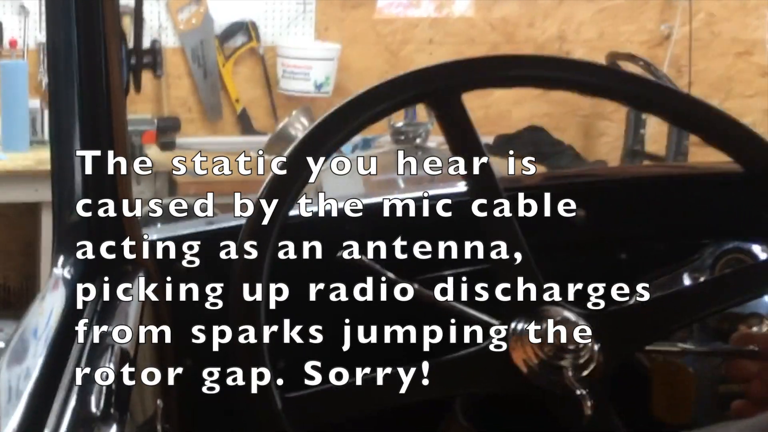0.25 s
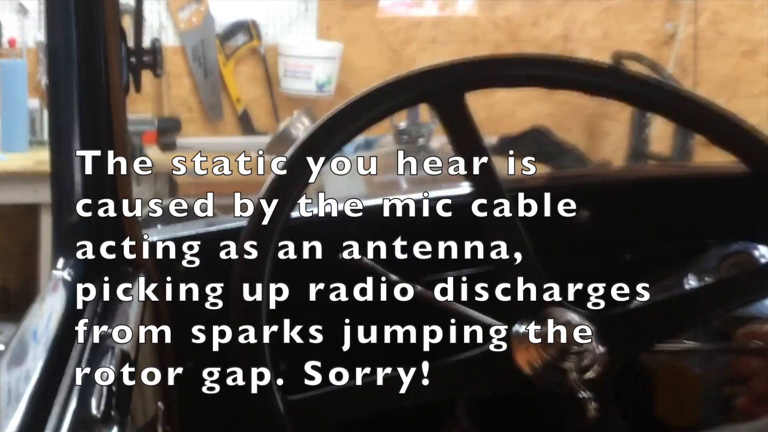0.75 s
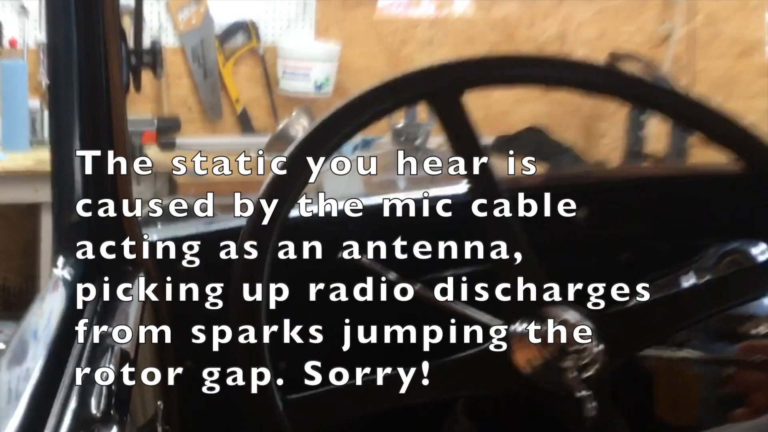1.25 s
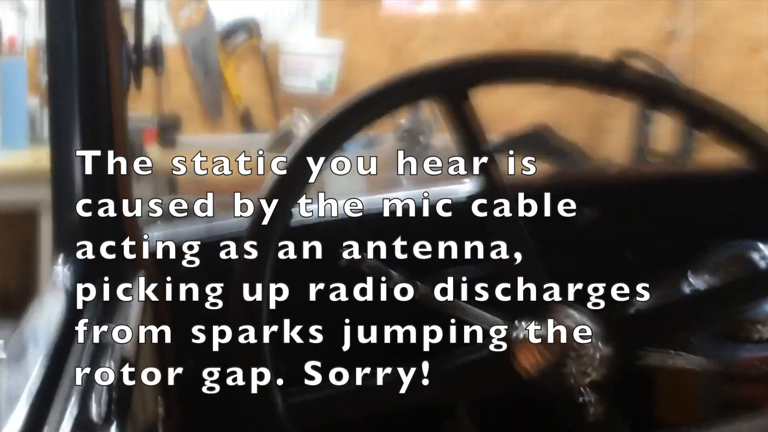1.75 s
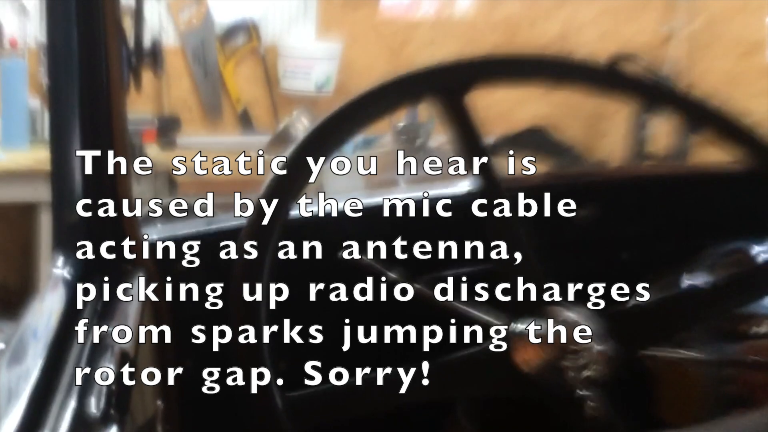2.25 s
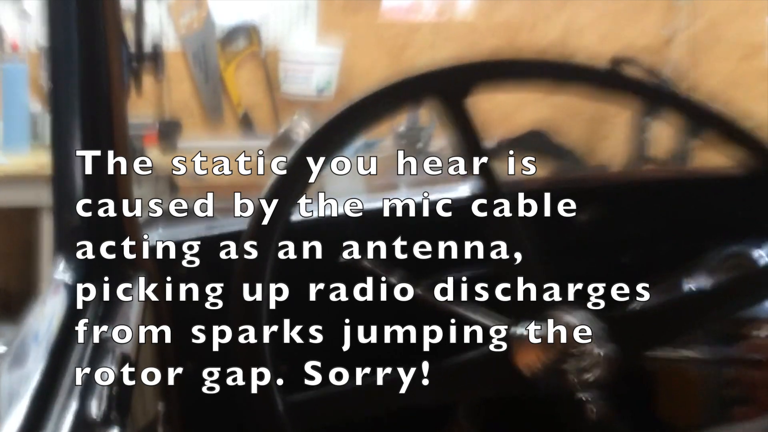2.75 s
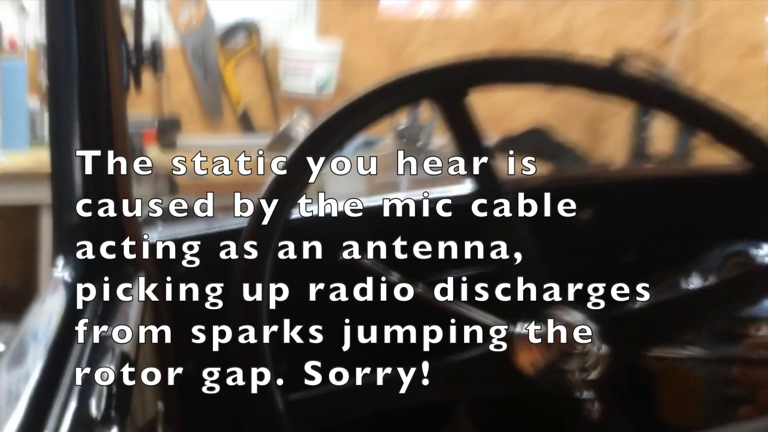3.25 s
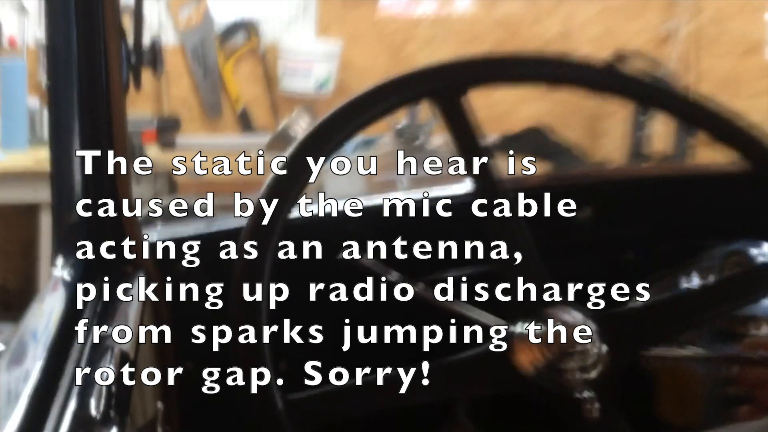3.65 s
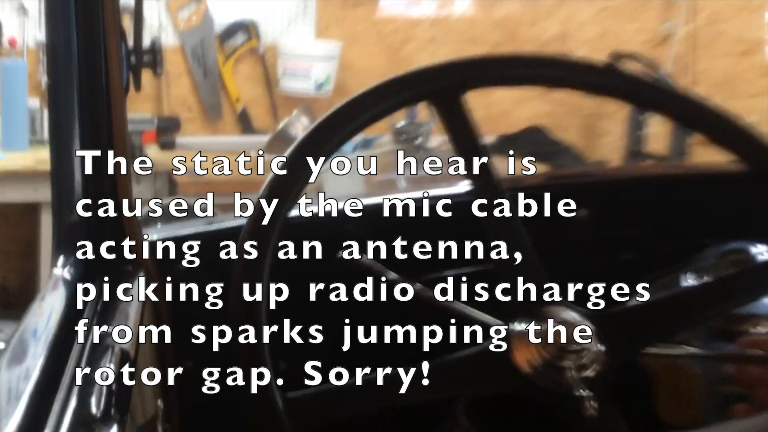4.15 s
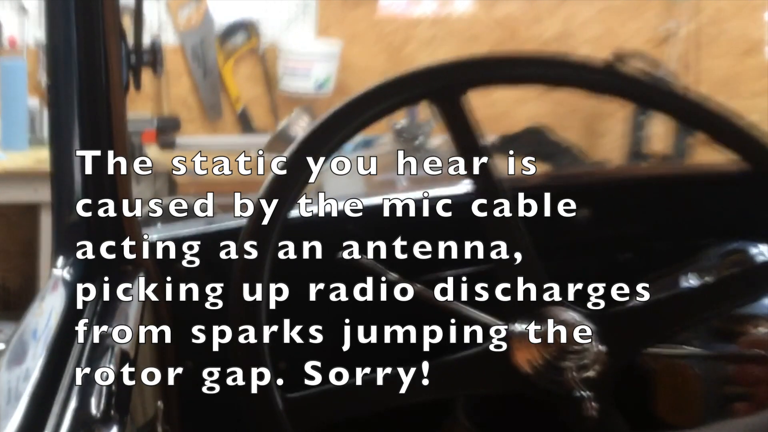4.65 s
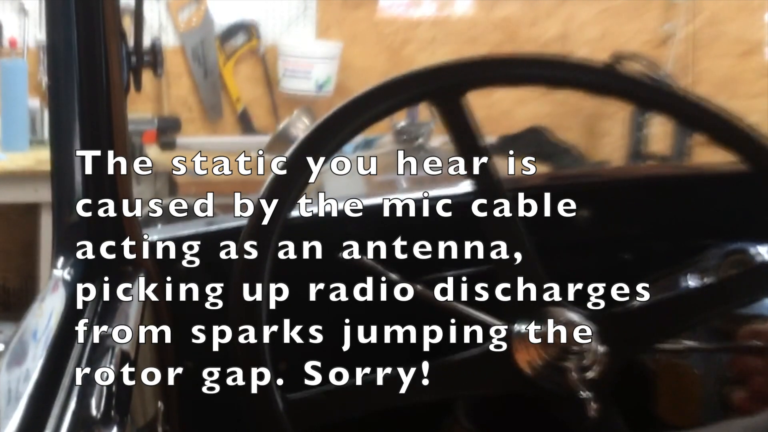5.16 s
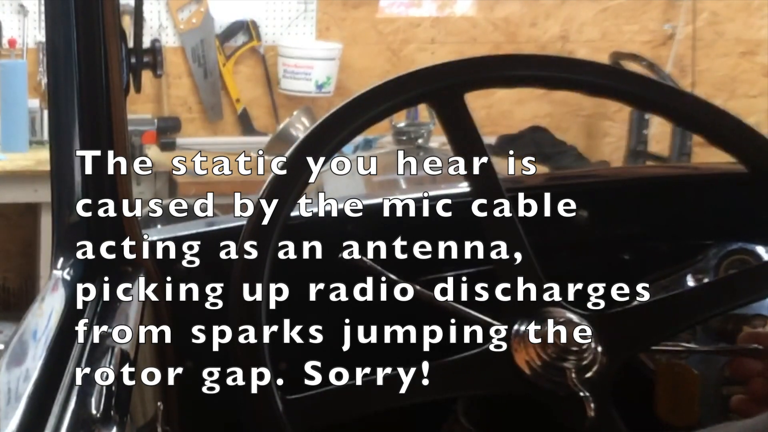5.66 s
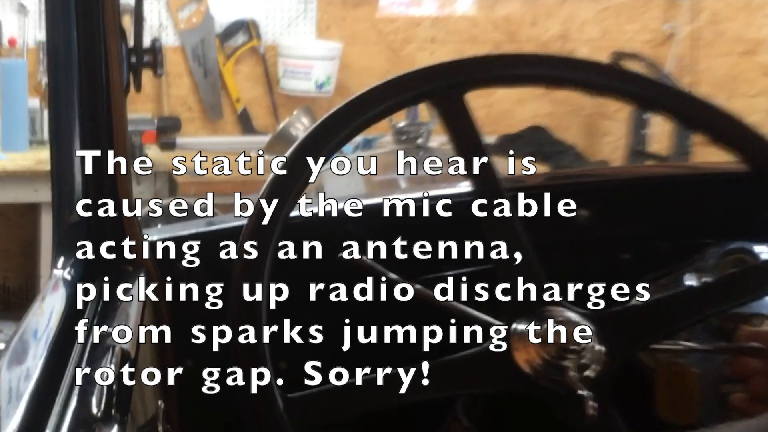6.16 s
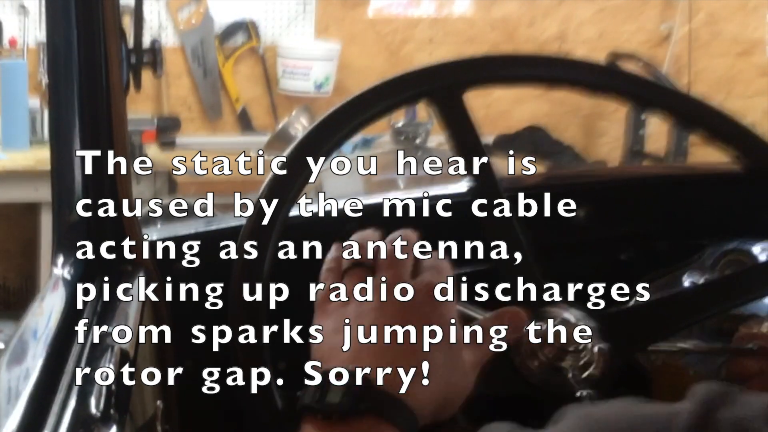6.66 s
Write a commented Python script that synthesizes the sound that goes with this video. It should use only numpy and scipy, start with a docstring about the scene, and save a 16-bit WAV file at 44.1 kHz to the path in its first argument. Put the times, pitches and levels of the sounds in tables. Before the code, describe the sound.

Inside an old car in a garage, the starter turns a four-cylinder engine in slow, muffled chugs. It catches after about a second, flares into a booming run with block knocks, valve clatter and rattling metal, then slows to a quieter lumpy idle. Loud spark pops crackle irregularly, thickest as it catches, briefly choking the microphone. Faint rustles and tiny squeaks come close by.

```python
"""An old four-cylinder car engine cranks in a garage, catches, runs up and sinks to a lumpy idle, heard from
the driver's seat. Throb and boom follow the firings; shaped noise makes the block, valves and loose metal.
The microphone cable picks up the ignition sparks as sharp pops that block the preamplifier for a moment.
Soft rustles in the cabin are swells of bright noise, and faint squeaks of the body are unsteady sines."""
import sys
import numpy as np
from scipy import signal
from scipy.fft import rfft, irfft, next_fast_len
from scipy.io import wavfile
from scipy.ndimage import uniform_filter1d, map_coordinates

SR = 44100
rng = np.random.default_rng(int(sys.argv[2]) if len(sys.argv) > 2 else 0)


def store_pcm(level_fs):
    """Save levels as 16-bit WAV."""
    pcm = np.round(np.clip(level_fs, -1, 1) * 32767).astype(np.int16)
    wavfile.write(sys.argv[1], SR, np.atleast_2d(pcm).T)


N = 305172


def amp(db):
    """Decibels to a linear factor."""
    return 10 ** (np.asarray(db) / 20)


def unit(x):
    """Scaled to rms 1."""
    return x / np.sqrt(np.mean(x ** 2) + 1e-20)


def curves(rows):
    """One value per sample for each column after the time."""
    seconds, *columns = np.transpose(rows)
    return [np.interp(np.arange(N) / SR, seconds, column) for column in columns]


def wobble(rate):
    """A smooth random curve, rate knots a second."""
    knots = rng.standard_normal(int(N * rate / SR) + 4)
    return map_coordinates(knots, [np.arange(N) * rate / SR])


def filtered(x, response):
    """x times a response of frequency."""
    size = next_fast_len(N + SR // 2)
    return irfft(rfft(x, size) * response(np.fft.rfftfreq(size, 1 / SR)), size)[:N]


def coloured(x, points):
    """x through a gain curve of (Hz, dB) points, then scaled to rms 1."""
    f, db = np.transpose(points)
    return unit(filtered(x, lambda hz: amp(np.interp(np.log(hz + 1), np.log(f), db))))


def steadied(x, span):
    """x held near rms 1 over stretches of span seconds."""
    size = int(span * SR) + 1
    power = uniform_filter1d(uniform_filter1d(x ** 2, size), size)
    return x / np.sqrt(np.abs(power) + 1e-20)


def add(track, s, sound):
    """Mix a sound into a track at time s."""
    part = track[round(s * SR):][:len(sound)]
    part += sound[:len(part)]


def strokes(firings, scatter_db, length):
    """One decaying burst per firing, length as a share of the cycle; each cylinder has its own strength."""
    # The four cylinders in firing order. Each row: strength in dB.
    cylinder_db = [-2.5, -4.5, -0.2, -3.5]
    index = firings.astype(int)
    count = index[-1] + 1
    strength = amp(np.resize(cylinder_db, count) + scatter_db * rng.standard_normal(count))
    return strength[index] * np.exp(-(firings % 1) / length)


def flare():
    """The burst of speed after the engine catches, as a 0-1 curve."""
    start_s, attack_s, hold_s, release_s = 1.88, 0.097, 0.703, 0.21
    corners = start_s + np.cumsum([0, attack_s, hold_s, release_s])
    return np.interp(np.arange(N) / SR, corners, [0, 1, 1, 0])


def exhaust(firings, rate):
    """The firing order throbs, while the exhaust puffs excite the resonances of the cabin into a boom."""
    # The exhaust follows engine speed. Each row: firings per second, throb in dB, cabin boom in dB
    # outside the flare, turbulence over the puffs of the running engine in dB.
    by_speed = [(4.76, -15, -25, 17), (13, -22, -30, 16.5), (22.3, -14, -19, 7), (27.4, -15.5, -22.5, 12),
                (34.2, -18.5, -18.5, 17), (40, -21.5, -18.5, 16.5)]
    # Resonances of cabin air and body panels. Each row: centre in Hz, width in Hz, gain in dB.
    resonances = [(49.5, 20.6, -3), (73.5, 20.4, 1.5), (100.4, 21.5, -7.5)]
    flare_boom_db = 7  # gained by the boom in the flare
    lumpy_tone, flare_tone = 0.078, 0.84  # share of the boom's power that is a clean tone (0-1)

    speeds, *columns = np.transpose(by_speed)
    throb_db, boom_db, turbulence_db = [np.interp(rate, speeds, column) for column in columns]
    flaring = flare()
    boom_db = boom_db + flare_boom_db * flaring
    even = np.clip(lumpy_tone + (flare_tone - lumpy_tone) * flaring, 0, 1)
    running = np.clip((rate - 14) / 14, 0, 1)

    shake_colour = [(6, -23), (16, -4.0), (30, -18.5), (50, -16), (110, -68), (300, -120)]  # (Hz, dB)
    shake = steadied(coloured(rng.standard_normal(N), shake_colour), span=0.62)
    pulse = np.sqrt(2) * np.sin(2 * np.pi * firings + 0.054 * wobble(5)) * amp(0.63 * wobble(24))
    # slow cranking only shakes the car
    throb = 0.8 * running * pulse + (.9 - 0.54 * running) * shake

    def cabin(f):
        response = 0
        for k, (centre, width, db) in enumerate(resonances):
            damping = 1j * f * width
            # neighbouring resonances have opposite polarity
            response = response + (-1) ** k * amp(db) * damping / (centre * centre - f * f + damping)
        return response

    def muffler(f):
        return 1 / np.sqrt(1 + (f / 125) ** 8)

    puffs = strokes(firings, scatter_db=2.5, length=0.39)
    drive = running * unit(puffs) + amp(turbulence_db) * rng.standard_normal(N)
    boom = steadied(filtered(drive, lambda f: cabin(f) * muffler(f)), span=0.45)
    # the clean tone runs at twice the firing rate
    tone = np.sqrt(2) * np.sin(4 * np.pi * firings + .08 * wobble(9)) * amp(.8 * wobble(12))
    return amp(throb_db) * throb + amp(boom_db) * (np.sqrt(even) * tone + np.sqrt(1 - even) * boom)


def panels(x, t60):
    """Body panels and garage walls ring at many closely spaced pitches, with no overall colour."""
    t = np.arange(SR // 4) / SR
    tail = rfft(rng.standard_normal(len(t)) * amp(-60 * t / t60))
    even = tail / np.sqrt(np.abs(uniform_filter1d(np.abs(tail) ** 2, size=20)))
    return unit(signal.fftconvolve(x, irfft(even))[:N])


def effort(firings):
    """Load in dB over steady running: the starter labours at each compression until the engine takes over."""
    # How hard the engine works once it runs. Each row: time in seconds, working noise in dB.
    running_load = [(1.8, -32.5), (2.04, -32), (2.9, -35), (3.14, -34), (3.92, -35), (4.45, -32),
                    (4.89, -29.5), (5.08, -32.5), (5.58, -40), (6.21, -40), (6.56, -39.5), (6.92, -39)]
    reference_db = -35  # the load of steady running
    starter_db, compression_db = -42, -0.5  # working noise on the starter, its swing at each compression
    catch_from_s, catch_to_s = 1.198, 1.85
    # the starter's load drops as the first cylinder fires
    relief_s, relief_width_s, relief_db = 1.267, 0.11, 9

    t = np.arange(N) / SR
    relief = relief_db * np.exp(-((t - relief_s) / relief_width_s) ** 2)
    starter = starter_db + compression_db * np.sin(2 * np.pi * firings) - relief
    caught = np.interp(t, [catch_from_s, catch_to_s], [0, 1])
    return (1 - caught) * starter + caught * curves(running_load)[0] - reference_db


def machinery(firings):
    """The block knocks at each firing, valves clatter twice as often, a tappet ticks and loose metal rattles."""
    # Colour of engine block and valve gear. Each row: frequency in Hz, relative gain in dB.
    block_colour = [(60, -30), (115, -2.5), (135, 4.5), (178, 6), (235, -4.5), (320, -4.5), (365, -12.5),
                    (420, -10), (490, -15.5), (600, -10.5), (715, -13), (790, -16), (1300, -24),
                    (4000, -47.5)]
    # Colour of the valve clatter. Each row: frequency in Hz, relative gain in dB.
    clatter_colour = [(400, -12), (1200, -2), (2000, 2.5), (3000, -0.5), (3700, -3.5), (5200, -5.5),
                      (8000, -10.5), (11000, -6), (13000, -7.5), (16000, -45)]
    # Ring of the ticking tappet. Each row: frequency in Hz, relative gain in dB.
    tappet_colour = [(1500, -24), (2900, -8), (3800, -12), (5000, 0), (5800, -5), (6600, -1), (8000, -11),
                     (13500, -13), (15500, -32)]
    # Colour of rattling sheet metal. Each row: frequency in Hz, relative gain in dB.
    sheet_colour = [(150, -9), (380, 6), (680, 5.5), (1300, -10.5), (2800, -16.5), (5000, -27),
                    (14000, -39)]
    # Loose metal shaken by the engine. Each row: start in seconds, relative strength in dB.
    rattle_hits = [(1.844, 8), (2.585, 1), (3.348, 3.5), (3.579, 4.5), (3.812, 5), (4.06, 0), (4.529, -1),
                   (4.755, 5), (4.887, -1), (4.994, -5)]
    # base level at the reference load (dB), and the dB gained per dB of load
    block_base_db, block_grows = -36, 0.87
    clatter_base_db, clatter_grows = -56, 0.74
    flare_clatter_db = 1.5  # the valves clatter louder in the flare
    tappet_s, tappet_half_s, tappet_db = 4.78, .66, -60.3  # middle, half length, level
    # fainter rattles at random times in the fast running: per second, relative strength, spread either way
    faint_rate, faint_db, faint_spread_db = 5, -4, 3.5
    fast_from_s, fast_to_s = 1.9, 5.2

    load_db = effort(firings)
    block_db = block_base_db + block_grows * load_db
    clatter_db = clatter_base_db + clatter_grows * load_db + flare_clatter_db * flare()

    # uneven combustion: every stroke has its own strength
    knocks = (.8 + strokes(firings, scatter_db=4, length=.45)) * amp(1.2 * wobble(12))
    block = unit(knocks * rng.standard_normal(N))
    block = coloured(block + .4 * panels(block, t60=.18), block_colour)

    taps = 2.5 + strokes(2 * firings, scatter_db=5.5, length=1.0)
    clatter = unit(taps * rng.standard_normal(N))
    clatter = coloured(clatter + .55 * panels(clatter, t60=.12), clatter_colour)

    # one tick per firing, for a while
    ticking = np.exp(-((np.arange(N) / SR - tappet_s) / tappet_half_s) ** 4)
    ticks = np.exp(-(firings % 1) / .08)
    tappet = coloured(ticks * rng.standard_normal(N), tappet_colour)

    stretch = fast_to_s - fast_from_s
    draws = rng.random((int(faint_rate * stretch), 2))
    faint = [(fast_from_s + when * stretch, faint_db + faint_spread_db * (2 * size - 1))
             for when, size in draws]
    jolts, t = np.zeros(N), np.arange(SR // 8) / SR
    for s, db in list(rattle_hits) + faint:
        # falls 60 dB in 90 ms after a 2 ms onset
        add(jolts, s, amp(db + 2 - 60 * t / .09) * (1 - np.exp(-t / .002)))
    rattle = jolts * coloured(rng.standard_normal(N), sheet_colour)

    body = amp(block_db) * (amp(2.5) * block + rattle)
    return body + amp(clatter_db) * clatter + amp(tappet_db) * ticking * tappet


def interference():
    """Spark pops, and the share of the microphone signal (0-1) that the overloaded preamplifier still passes."""
    # Ignition pops. Each row: start in seconds, relative size in dB,
    # time the preamplifier stays blocked in seconds.
    sparks = [(.0239, 1, 0.026), (.3205, -5, 0.019), (0.7392, -4.5, 0.0086), (.9556, -5, 0.0033),
              (1.1439, -5, 0.013), (1.2176, -11, 0.011), (1.2935, -9.5, 0.008), (1.3644, -2.5, 0.029),
              (1.428, 2.5, 0.017), (1.4859, 2, 0.023), (1.5383, 2.5, 0.018), (1.586, 2, 0.023),
              (1.6272, 3, 0.016), (1.6657, 2.5, 0.011), (1.8596, -9.5, 0.011), (1.9147, -6, 0.018),
              (2.0734, -13, 0.0023), (2.1735, -3.5, 0.027), (2.2229, 0, 0.0061), (2.323, -16, 0.0042),
              (2.3731, -5, 0.013), (2.6289, -10, 0.0033), (2.6554, -2.5, 0.0094), (2.736, -4, 0.0081),
              (2.8455, -3, .021), (3.014, -5, 0.005), (3.0716, -8, 0.0027), (3.3027, -3, 0.017),
              (3.684, -3, 0.011), (3.8911, -4, 0.0051), (3.921, -10.5, .004), (4.2447, -8, 0.0035),
              (4.6569, -8, 0.0065), (4.7156, -7, 0.0055), (5.0078, -4, 0.0023), (5.3839, 0.5, 0.0059),
              (5.453, -6, 0.0028), (5.7526, -0.5, 0.0054)]
    # Brief discharges that only tick. Each row: start in seconds, size in dB.
    discharges = [(0.4402, -27), (1.7651, -15), (1.8448, -31), (3.479, -26.5), (4.415, -14), (5.74, -23)]
    snap_s, sag_s, plateau, release_s = 0.00037, 0.0093, 0.41, 0.0028  # plateau as a share of the drop
    # swing the other way, per second of blocking: two parts, each with its decay time
    rebound, settle_s, offset, drain_s = 26, 0.01, 10.7, 0.072

    pops, blocked, t = np.zeros(N), np.zeros(N), np.arange(SR // 3) / SR
    for s, db, hold in sparks:
        # the voltage drops at once, creeps a little further, then sags to a plateau
        sag = plateau + (1 - plateau) * np.exp(-(t / sag_s) ** 2)
        drop = (1 - .5 * np.exp(-t / snap_s)) * sag
        held = .5 - .5 * np.tanh((t - hold) / release_s)
        # the coupling capacitor, charged for as long as the block lasts, swings the other way and drains slowly
        after = np.maximum(t - hold, 0)
        swing = hold * (rebound * np.exp(-after / settle_s) + offset * np.exp(-after / drain_s))
        add(pops, s, amp(db - 1.0) * (swing * (1 - held) - drop * held))
        # weak pops only dim the sound; the hardest let it through briefly, then jam the stage at its other rail
        jammed = (db > -2.7) * (hold > .01) * (after > .012) * (after < .11)
        stage = np.clip(amp(db + 6), 0, 1) * held + jammed
        rest = blocked[round(s * SR):][:len(t)]
        add(blocked, s, stage[:len(rest)] - rest)  # each spark resets the stage
    for s, db in discharges:
        add(pops, s, amp(db) * np.hanning(7))
    return pops, 1 - uniform_filter1d(np.clip(blocked, 0, .96), size=90)


def rustles():
    """Soft rustles in the cabin: short, fluttering swells of bright noise."""
    # Rustles close by. Each row: start in seconds, length in seconds, level in dB.
    swells = [(0.33, 0.25, -61.5), (.78, 0.17, -68), (1.27, .1, -55.5), (1.801, .11, -51),
              (5.597, .16, -59.5), (6.079, .18, -62), (6.441, .16, -65)]
    # Their colour. Each row: frequency in Hz, relative gain in dB.
    rustle_colour = [(1500, -12), (4000, -2.5), (7000, -8), (11500, -2.5), (16000, -29)]
    level = np.zeros(N)
    for s, length, db in swells:
        add(level, s, amp(db) * np.sqrt(np.hanning(int(length * SR))))
    flutter = amp(2.5 * wobble(45))
    return level * flutter * coloured(rng.standard_normal(N), rustle_colour)


def squeaks():
    """Thin tones of rubbing parts: sines unsteady in pitch and level."""
    # Faint squeaks of the shaking body. Each row: start in seconds, length in seconds,
    # mean pitch in Hz, relative level in dB.
    rubs = [(.34, .1, 11600, -59), (1.025, 0.2, 3000, -62), (6.062, 0.18, 2189, -56)]
    track = np.zeros(N)
    for s, length, hz, db in rubs:
        phase = 2 * np.pi * np.cumsum(hz + 55 * wobble(220)) / SR
        tone = np.sin(phase) * amp(db - 3 + 3.5 * wobble(70))
        size = int(length * SR)
        add(track, s, tone[:size] * np.sqrt(np.hanning(size)))
    return track


def scene():
    """The engine, heard through a preamplifier that the sparks keep upsetting."""
    # Starter turning, then the first firings. Each row: time in seconds, compressions per second.
    cranking = [(0, 4.6), (1.1, 4.73), (1.2, 13.3), (1.65, 26)]
    # Running engine. Each row: time in seconds, firings per second.
    running = [(1.8, 33), (2.0, 38.7), (2.23, 41.3), (3.07, 35.4), (3.44, 36.2), (3.73, 32.8), (4.15, 36.3),
               (5.15, 34.1), (5.79, 25.5), (6.53, 22.8), (6.92, 23.8)]
    rate, = curves(list(cranking) + list(running))
    firings = np.cumsum(rate) / SR  # running count
    engine = exhaust(firings, rate) + machinery(firings)
    heard = engine + rustles() + squeaks()
    pops, passed = interference()
    return (heard * passed + pops)[None]


def record(dry):
    """The sound fades out at the very end; the recorder clips at full scale, softens the treble and keeps
    nothing above its band limit."""
    top_hz = 16600
    fade = np.minimum(np.arange(N)[::-1] / (.008 * SR), 1)  # the last 8 ms
    clipped = np.clip(dry[0] * fade, -1, 1)
    soft = filtered(clipped, lambda hz: 1 / np.sqrt(1 + (hz / 12500) ** 8))
    return filtered(soft, lambda hz: hz < top_hz)[None]


dry = scene()
out = record(dry)
store_pcm(out)
```